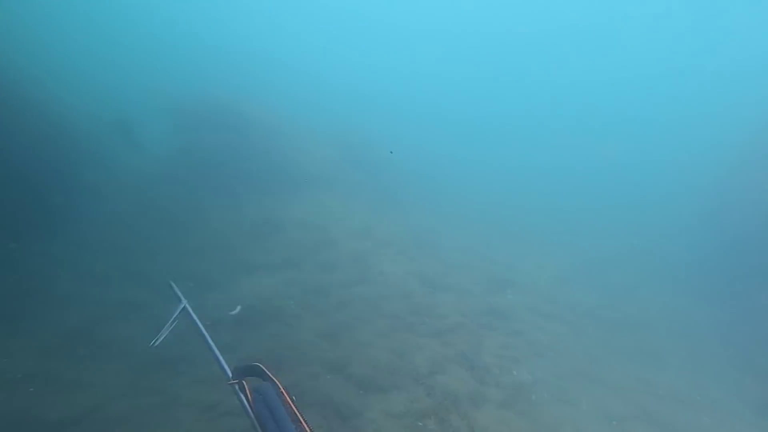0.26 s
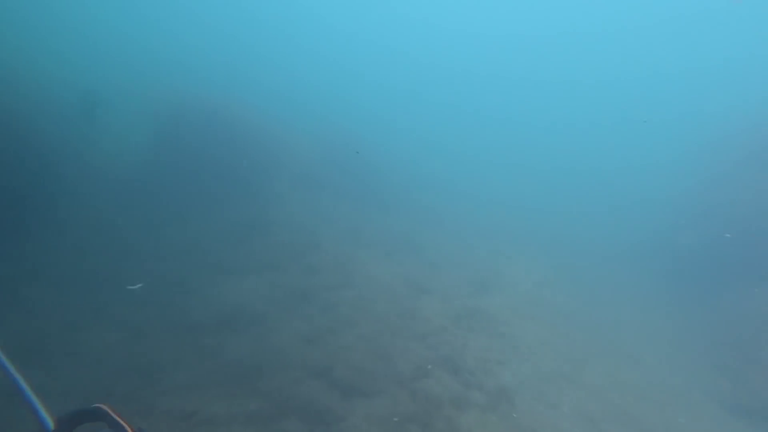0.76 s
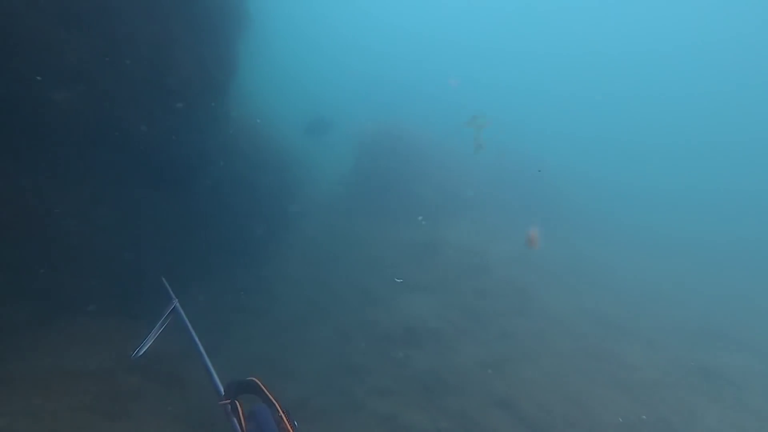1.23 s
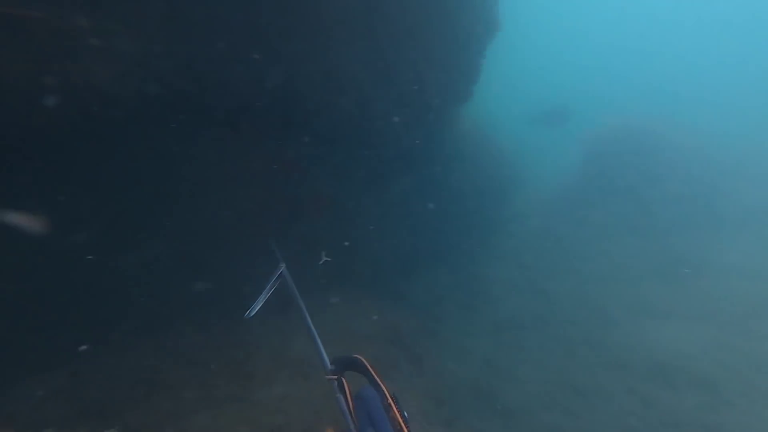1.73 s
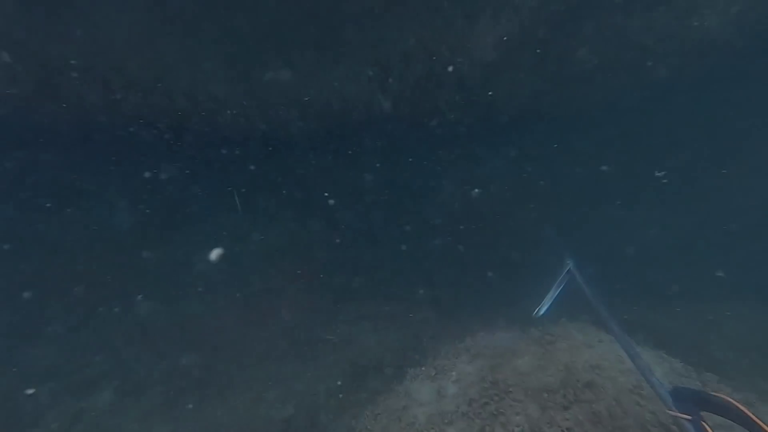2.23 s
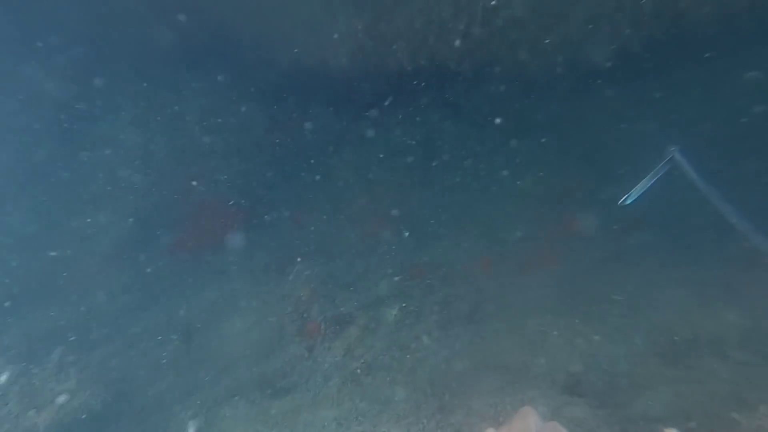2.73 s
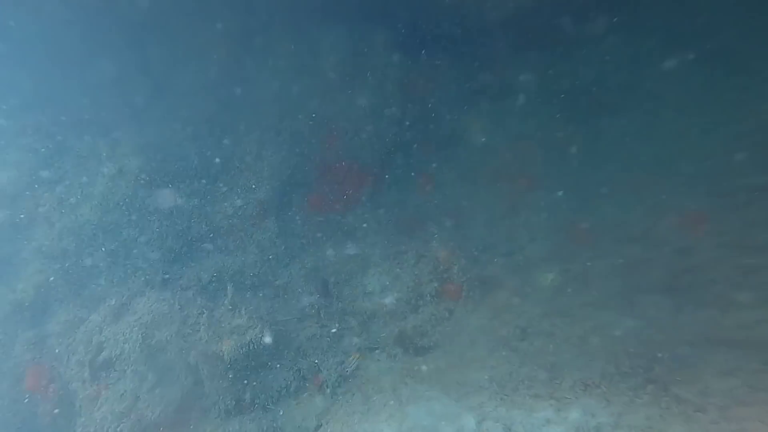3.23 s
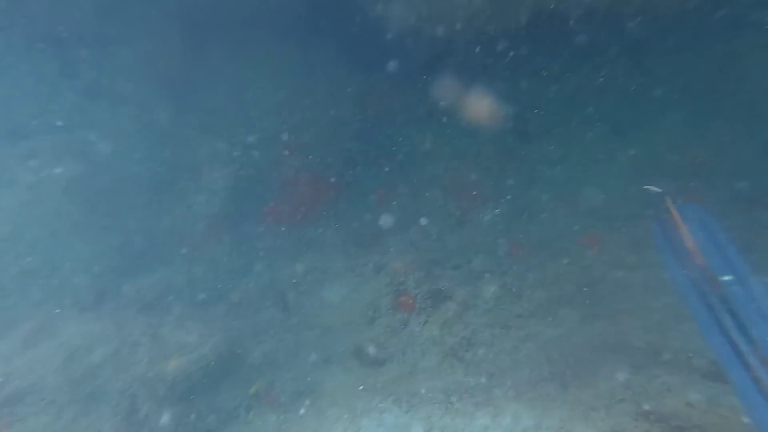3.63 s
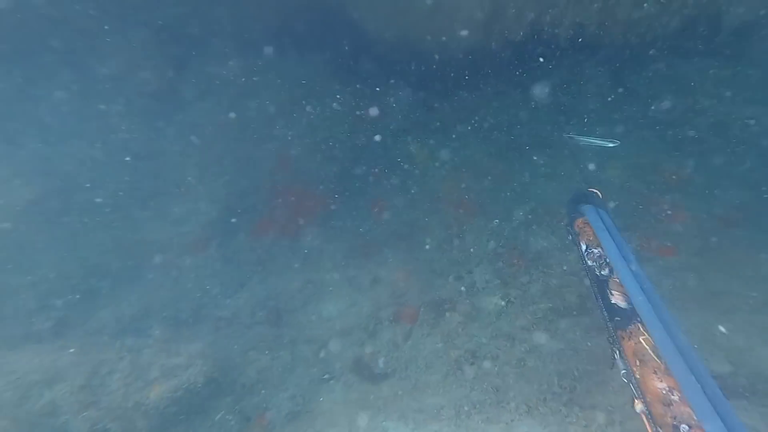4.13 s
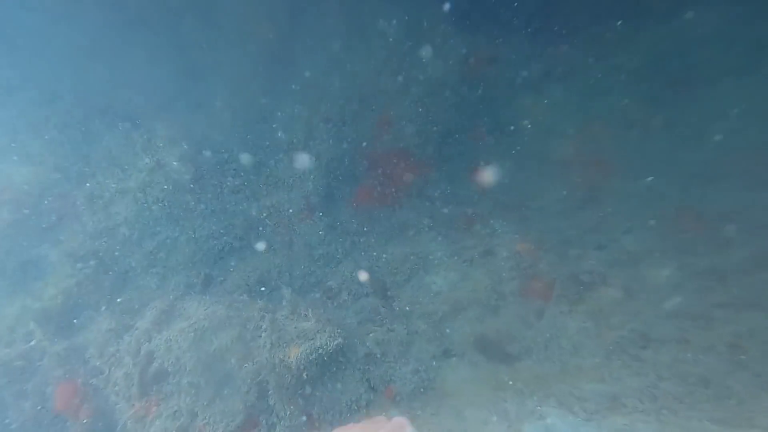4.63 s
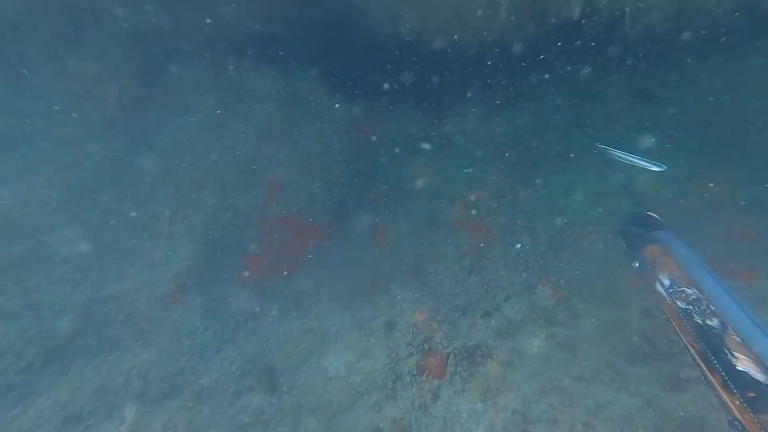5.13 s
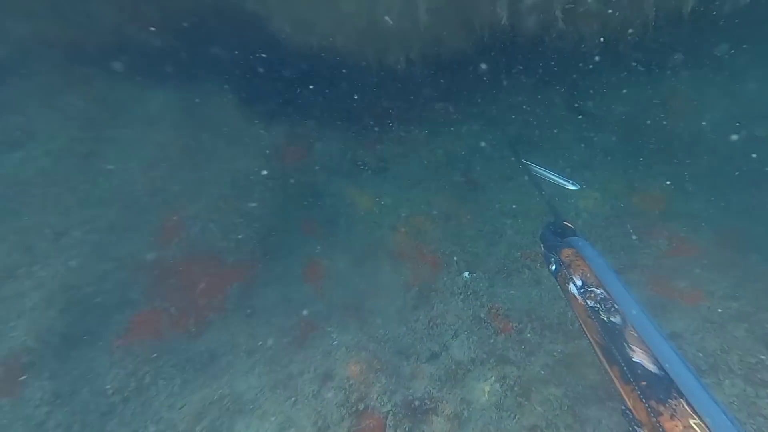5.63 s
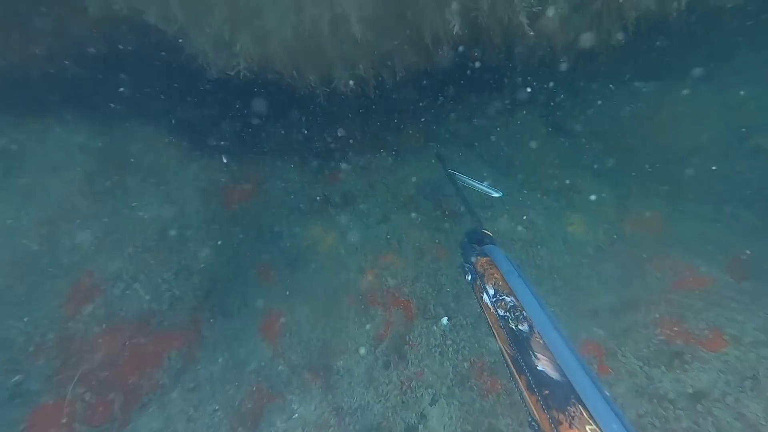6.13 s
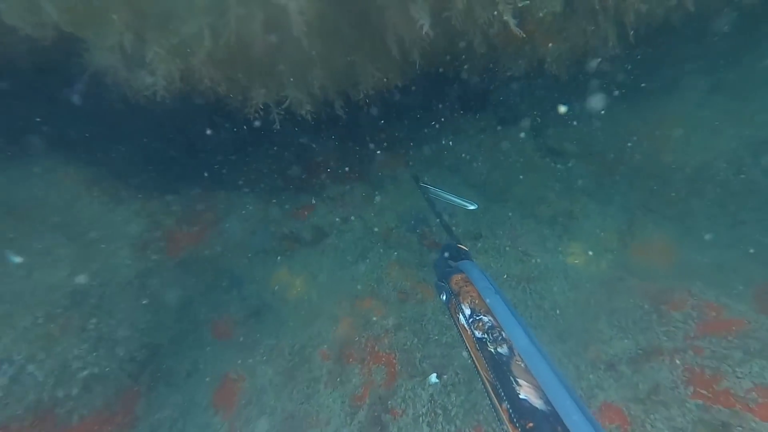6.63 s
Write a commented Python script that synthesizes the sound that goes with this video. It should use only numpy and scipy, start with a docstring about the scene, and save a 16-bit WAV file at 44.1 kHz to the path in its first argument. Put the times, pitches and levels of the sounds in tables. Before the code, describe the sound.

Underwater, shrimp crackle and snap over a low water rumble, with dull bumps and a few hollow clacks of diving gear.

```python
"""A diver drifts along a rocky reef with a camera in a waterproof housing. From the start, shrimp snap
all around and ring the housing, near ones sharp, far ones a fizz; the water rumbles and hums, and a murmur
swells as the grip shifts. From 2 s on, gear bumps the mount and three shoves set off deep swings.
Hard parts clack at 2.4 s, rubber squeaks at 4 s, and more bumps fall near 4.8 and 5.8 s.
Two lighter clacks follow just after 6 s, the second with a hard click; the shrimp crackle to the end."""
import sys
import numpy as np
from scipy import signal
from scipy.fft import rfft, irfft, next_fast_len
from scipy.io import wavfile

SR = 44100
rng = np.random.default_rng(int(sys.argv[2]) if len(sys.argv) > 2 else 0)


def pcm_store(signal):
    """Save signal as 16-bit PCM."""
    levels = np.round(np.clip(np.atleast_2d(signal), -1, 1) * 32767)
    wavfile.write(sys.argv[1], SR, levels.astype(np.int16).T)


N = 302967
LEFT_LAG_SAMPLES = 6


def gain_of(db):
    """Decibels to amplitude."""
    return 10 ** (np.asarray(db) / 20)


def unit_rms(x):
    """Scales to unit rms."""
    return x / np.sqrt(np.mean(x ** 2) + 1e-20)


def spectrum_db(rows, hz, column=1):
    """One column of a spectrum table, interpolated over log frequency."""
    table = np.transpose(rows)
    return np.interp(np.log(hz + 1), np.log(table[0] + 1), table[column])


def envelope(rows):
    """Rows of seconds and dB to a gain per sample."""
    return gain_of(np.interp(np.arange(N) / SR, *np.transpose(rows)))


def add(mix, start_s, sound):
    """Mixes a sound in at start_s."""
    part = mix[..., max(round(start_s * SR), 0):][..., :sound.shape[-1]]
    part += sound[..., :part.shape[-1]]


def minimum_phase(rows, column=1, size=2048):
    """Impulse response with this spectrum, ringing only after its onset."""
    hz = abs(np.fft.fftfreq(size, 1 / SR))
    log_gain = np.log(gain_of(spectrum_db(rows, hz, column)))
    return np.fft.ifft(np.exp(np.conj(signal.hilbert(log_gain)))).real


def shaped(x, rows):
    """Filters a steady sound by this spectrum; unit rms."""
    size = next_fast_len(N)
    response = gain_of(spectrum_db(rows, np.fft.rfftfreq(size, 1 / SR)))
    return unit_rms(irfft(rfft(x, size) * response, size)[:N])


def wander(rate_hz):
    """Random curve of unit rms with rate_hz knots a second."""
    knots = rng.standard_normal(N // 20)
    return unit_rms(np.interp(np.arange(N) * rate_hz / SR, np.arange(len(knots)), knots))


def snap(ring_hz, depth_db, sparkle_db, scatter_s, build_s=0.00041, ring_db=8, ring_octaves=0.2):
    """A spike, as of a collapsing bubble, and a spray of rock echoes. Direction favours one shell ring."""
    size, coherence = 2048, 0.6
    t = np.arange(size) / SR
    shared, left, right = rng.standard_normal((3, size))
    spray = np.sqrt(coherence) * shared + np.sqrt(1 - coherence) * np.array([left, right])
    spray *= (1 - np.exp(-t / build_s)) * np.exp(-t / scatter_s)
    spray /= np.linalg.norm(spray[0])
    spray[:, 0] += 0.39  # direct spike
    hz = np.geomspace(300, SR / 2, 120)
    tilt_db = spectrum_db([(1500, depth_db), (3000, 0), (6000, 0.0059), (10000, sparkle_db)], hz)
    peak_db = ring_db * np.exp(-(np.log2(hz / ring_hz) / ring_octaves) ** 2)
    colour = minimum_phase(np.transpose([hz, tilt_db + peak_db]), size=512)
    sound = housing(signal.fftconvolve(spray, colour[None], axes=1)[:, :size])
    return sound / np.linalg.norm(sound)


# Sharp shrimp snaps, plus the hard click of the gear clack at 6.17 s.
# Each row: start in seconds, relative level in dB, favoured ring in Hz,
# depth (gain at 1.5 kHz) in dB, sparkle (gain at 10 kHz) in dB.
SNAPS_AND_CLICK = [(0.1707, -19, 4400, -7.5, -9), (0.41, -27.5, 1800, -5.5, -19),
                   (0.5592, -28.5, 1360, 5.5, 1), (0.6914, -23.5, 4630, -4.5, 3.5),
                   (0.8502, -22, 4970, -5, -3), (0.909, -24, 1790, 0, -1), (0.9755, -20.5, 1610, 4, -36),
                   (1.0866, -24.5, 4830, -4, 4), (1.235, -20.5, 5170, -7.5, 0), (1.3468, -33, 4120, -4, 5),
                   (1.698, -28.5, 4500, 3, 0), (1.715, -29.5, 3640, 4, -36), (1.7427, -21.5, 4260, -3, -1),
                   (1.9236, -24, 4360, -8.5, 5), (1.9698, -24, 3480, -0.5, 1),
                   (2.1783, -38.5, 12600, -23, 10), (2.317, -22.5, 1980, -4.5, -21),
                   (2.403, -22, 1930, 2, -13), (2.6933, -25, 3950, -0.5, -14), (2.777, -49, 12500, -22, 20),
                   (2.793, -27, 4870, 1, -1), (2.9137, -32.5, 5600, -3.5, -2),
                   (3.2651, -28.5, 5800, -6, 12.5), (3.6995, -43, 12500, -26, 11),
                   (4.2097, -27, 2320, -7, -15), (4.254, -29, 3060, -9, -2), (4.3074, -20, 4540, -1.5, -9),
                   (4.595, -23.5, 2390, -2, 1), (4.6696, -32, 2110, -4, -1), (4.7243, -26.5, 2700, -3, 2),
                   (4.9275, -27, 5400, 1, 5), (5.3776, -25.5, 5200, -18, 9.5), (5.836, -32.5, 4800, -2, -2),
                   (6.1706, -20.5, 1380, 8.5, -16), (6.294, -34.5, 1530, 4, 4),
                   (6.509, -33.5, 4900, 5.5, -8), (6.6025, -36.5, 6050, -8, 3)]


def snaps_and_click(gain_db=29, typical_db=-23, typical_scatter_s=0.0027):
    """Near shrimp and one gear click. Echoes last longer when faint (far) or deep (via the rock)."""
    out = np.zeros((2, N))
    for start_s, db, ring_hz, depth_db, sparkle_db in SNAPS_AND_CLICK:
        doublings = (typical_db - db) / 9 + depth_db / 14
        scatter_s = typical_scatter_s * 2 ** doublings
        add(out, start_s, gain_of(db + gain_db) * snap(ring_hz, depth_db, sparkle_db, scatter_s))
    return out


# Path from water to microphones. Each row: frequency in Hz, left gain in dB, right gain in dB.
HOUSING_RESPONSE = [(413, -15.5, -10.5), (914, -25, -24.5), (989, -1.5, -13), (1265, -32, -6),
                    (1387, -7, -3.5), (1810, 8, -1.5), (2060, -8, 1), (2490, -4, -20), (2600, -4.5, -4.5),
                    (3200, 0, -17.5), (3862, 1.5, 1.5), (4085, -8, -7.5), (4980, -10, -5), (5020, -3, 2),
                    (5504, -10.5, -3), (7490, -18, -21), (8560, -23.5, -29), (10550, -25.5, -30.5),
                    (12560, -42.5, -28.5), (16000, -49, -51.5)]


def housing(x):
    """The shell rings differently at each microphone and reaches the left one later."""
    left = np.roll(minimum_phase(HOUSING_RESPONSE, column=1), LEFT_LAG_SAMPLES)
    right = minimum_phase(HOUSING_RESPONSE, column=2)
    return signal.oaconvolve(x, np.array([left, right]), axes=1)[:, :x.shape[1]]


def crackle(snaps, per_s, spread_db, max_nearness):
    """Snaps at random times: few shrimp are near and loud, many far and faint."""
    out = np.zeros((2, N))
    draws = np.random.default_rng(rng.integers(2 ** 31)).random((int(per_s * N / SR), 3))
    for when, distance, pick in draws:
        db = spread_db * min(-np.log(distance), max_nearness)
        add(out, when * N / SR, gain_of(db) * snaps[int(pick * len(snaps))])
    return unit_rms(out)


# Each row: frequency in Hz, relative level in dB.
FIZZ_SPECTRUM = [(1000, 4.5), (3000, -2), (7000, 7.5), (11000, 4), (15500, 12)]


def fizz():
    """The farthest snaps blur into noise, partly shared by both microphones."""
    blur = rng.standard_normal(N) + 1.65 * rng.standard_normal((2, N))
    return unit_rms(housing(np.array([shaped(side, FIZZ_SPECTRUM) for side in blur])))


# Each row: time in seconds, relative level in dB.
COLONY_LEVEL = [(0.0, -46), (0.31, -51.5), (0.88, -46.5), (1.24, -49.5), (3.75, -52), (4.36, -48.5),
                (5.2, -50), (5.66, -48.5), (5.85, -55.5), (6.1, -52), (6.28, -52), (6.87, -52)]


def far_shrimp(dull_db=5, ticks_db=-13, fizz_db=-2, flurry_db=2.5, count=60):
    """Dull crackle off the rocks in brief flurries, thin ticks in direct line of the camera, and fizz."""
    rings_hz = np.geomspace(1450, 6500, count)
    dull_snaps = [snap(hz, 2.24 * depth - 2, 4.9 * sparkle + 2, scatter_s=0.0028 * np.exp(0.5 * smear))
                  for hz, (depth, sparkle, smear) in zip(rings_hz, rng.standard_normal((count, 3)))]
    thin_snaps = [snap(hz, depth_db=-28, sparkle_db=10, scatter_s=0.0011)
                  for hz in np.geomspace(6500, 14000, count // 4)]
    flurries = gain_of(flurry_db * wander(rate_hz=28))
    dull = gain_of(dull_db) * flurries * crackle(dull_snaps, per_s=600, spread_db=6, max_nearness=4.84)
    ticks = gain_of(ticks_db) * crackle(thin_snaps, per_s=120, spread_db=4.5, max_nearness=6.5)
    return envelope(COLONY_LEVEL) * (dull + ticks + gain_of(fizz_db) * fizz())


def struck(modes, contact_s):
    """Decaying modes, driven up over the contact time; neighbours swing in opposite senses."""
    t = np.arange(SR // 5) / SR
    rise = np.sin(np.pi / 2 * np.minimum(t / contact_s, 1)) ** 2
    detune = 1 + 0.0365 * rng.standard_normal(len(modes))
    return rise * sum((-1) ** k * gain_of(db - 60 * t / t60_s) * np.sin(2 * np.pi * hz * detune[k] * t)
                      for k, (hz, db, t60_s) in enumerate(modes))


# Camera and mount. Each row: frequency in Hz, relative level in dB, T60 in seconds.
MOUNT_MODES = [(43, -6, 0.2), (85.7, 4, 0.084), (125, 4, 0.07), (159, 2, 0.082), (222, -1.5, 0.066),
               (328.3, 3, 0.07), (414.6, 3, 0.062), (451, 4, 0.064), (589, -6.5, 0.076), (645, -6, 0.04)]
# Centres of the thump, body and ring bands in Hz.
BUMP_BANDS_HZ = [116, 251, 546]
# Each row: start in seconds, then thump, body and ring gains in dB.
BUMPS = [(1.961, -18.5, -18.5, -31.5), (1.972, -25.5, -25.5, -27), (2.435, -38, -34, -45),
         (2.512, -25, -51, -35.5), (2.551, -21, -56, -48), (3.342, -33.5, -26, -31.5),
         (3.398, -38.5, -38.5, -52), (3.54, -41, -14, -59), (4.762, -31, -14.5, -42),
         (4.768, -24.5, -28, -15.5), (4.801, -36, -36, -47), (4.829, -48, -15.5, -38.5),
         (4.877, -27, -36, -40.5), (5.336, -41, -37, -44), (5.791, -23.5, -11, -26),
         (5.799, -21, -22.5, -32), (6.375, -43.5, -35.5, -56)]


def bumps(gain_db=6, contact_s=0.0022, padding_hz=680):
    """Soft blows ring the low modes of the mount; the padded contact keeps them dull."""
    out = np.zeros(N)
    for start_s, *band_db in BUMPS:
        modes = [(hz, db + np.interp(np.log(hz), np.log(BUMP_BANDS_HZ), band_db), t60_s)
                 for hz, db, t60_s in MOUNT_MODES]
        add(out, start_s, gain_of(gain_db) * struck(modes, contact_s))
    return signal.sosfilt(signal.butter(4, padding_hz, fs=SR, output="sos"), out)


# Each row: start in seconds, relative level in dB.
CAMERA_SHOVES = [(1.968, -17), (2.736, -21), (4.882, -18)]


def shoves(swing_hz=39, t60_s=0.19):
    """The camera jerks and the water pushes back: a deep, short swing of pressure."""
    out = np.zeros(N)
    t = np.arange(SR // 4) / SR
    for start_s, db in CAMERA_SHOVES:
        add(out, start_s, gain_of(db - 60 * t / t60_s) * np.sin(2 * np.pi * swing_hz * t))
    return out


# Each row: frequency in Hz, relative level in dB, T60 in seconds.
GEAR_MODES = [(454, 11.5, 0.04), (553, -5, 0.076), (680, -13, 0.045), (806, 1, 0.031), (1022, -19, 0.098),
              (1270, -5, 0.045), (1730, -3, 0.039)]
# Each row: start in seconds, relative level in dB.
GEAR_CLACKS = [(2.435, -17), (6.051, -37.5), (6.169, -28)]


def clacks(contact_s=0.0069):
    """Hard parts of the gear meet and ring hollow."""
    out = np.zeros(N)
    for start_s, db in GEAR_CLACKS:
        add(out, start_s, gain_of(db) * struck(GEAR_MODES, contact_s))
    return out


# Each row: time in seconds, pitch in Hz, relative level in dB.
SQUEAK_CONTOUR = [(4.011, 500, -55), (4.018, 542, -33.5), (4.028, 602, -37), (4.040, 543, -43),
                  (4.052, 467, -58)]


def squeak():
    """Rubber slips briefly: a soft tone that arches in pitch."""
    times_s, hz, db = np.transpose(SQUEAK_CONTOUR)
    t = np.arange(times_s[0], times_s[-1], 1 / SR)
    phase = 2 * np.pi * np.cumsum(np.interp(t, times_s, hz)) / SR
    out = np.zeros(N)
    add(out, times_s[0], gain_of(np.interp(t, times_s, db)) * np.sin(phase))
    return out


# Each row: time in seconds, relative level in dB.
FLOW_LEVEL = [(0.0, -43.5), (0.74, -50), (0.92, -43), (1.32, -46), (1.62, -50), (1.89, -45.5),
              (2.05, -39.5), (2.7, -40.5), (3.1, -44.5), (3.81, -36.5), (4.0, -44.5), (4.99, -35.5),
              (6.1, -45.5), (6.35, -37.5), (6.45, -39), (6.87, -46)]
# Each row: frequency in Hz, relative spectral density in dB.
FLOW_SPECTRUM = [(8, -2.5), (20, -3), (38, 2.5), (62, -6.5), (90, -11), (140, -23), (260, -31.5),
                 (700, -56), (2000, -100)]


def water_flow(gain_db=5, lumpy_db=2):
    """Eddies press on the housing: a lumpy rumble."""
    eddies = rng.standard_normal(N) * gain_of(lumpy_db * wander(rate_hz=11))
    return gain_of(gain_db) * envelope(FLOW_LEVEL) * shaped(eddies, FLOW_SPECTRUM)


# Each row: midpoint in seconds, length in seconds, relative level in dB.
GRIP_SHIFTS = [(0.0, 0.17, -49), (0.795, 0.59, -62), (1.482, 0.14, -52), (2.527, 0.8, -52),
               (3.122, 0.4, -49.5), (3.504, 0.67, -46), (4.782, 1, -49.5), (5.41, 0.75, -49),
               (6.38, 0.34, -51.5)]
# Shared by hum and murmur. Each row: frequency in Hz, relative spectral density in dB.
HOLLOW_SPECTRUM = [(60, -41), (150, -5), (270, -10), (350, -4.5), (450, 3.5), (520, -8.5), (580, -4),
                   (720, -22), (900, -32), (2000, -83)]


def water_hum_and_grip(gain_db=-0.5, hum_db=-54.5, grain_db=3):
    """A steady hollow water hum near 450 Hz, with a dull murmur swelling as the grip shifts."""
    t = np.arange(N) / SR
    swells = sum(gain_of(db) * np.cos(np.pi * np.clip((t - middle_s) / length_s, -0.5, 0.5)) ** 2
                 for middle_s, length_s, db in GRIP_SHIFTS)
    grainy = rng.standard_normal(N) * gain_of(grain_db * wander(rate_hz=70))
    return gain_of(gain_db) * (gain_of(hum_db) + swells) * shaped(grainy, HOLLOW_SPECTRUM)


def reef_echoes(x, wet_db=-17, t60_s=0.14):
    """Adds faint, quickly fading echoes from the overhang and the surface."""
    t = np.arange(8192) / SR
    tail = rng.standard_normal((2, len(t))) * gain_of(-60 * t / t60_s)
    tail /= np.linalg.norm(tail[0])
    return x + gain_of(wet_db) * signal.oaconvolve(x, tail, axes=1)[:, :N]


def scene(left_db=1, right_db=-1.67):
    """Snaps arrive with reef echoes; handling and water noise reach both microphones nearly alike."""
    close = bumps() + clacks() + squeak() + shoves() + water_flow() + water_hum_and_grip()
    left = gain_of(left_db) * np.roll(close, LEFT_LAG_SAMPLES)
    right = gain_of(right_db) * close
    return reef_echoes(snaps_and_click() + far_shrimp()) + np.array([left, right])


def record(dry, cutoff_hz=16200):
    """The band limit of the camera."""
    lowpass = signal.firwin(511, cutoff_hz, window=("kaiser", 9), fs=SR)
    return signal.oaconvolve(dry, lowpass[None], "same")


dry = scene()
out = record(dry)
pcm_store(out)
```